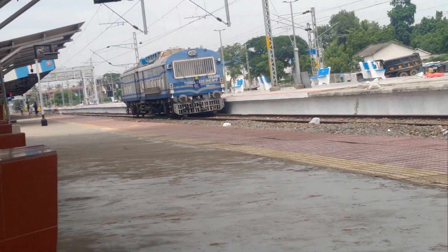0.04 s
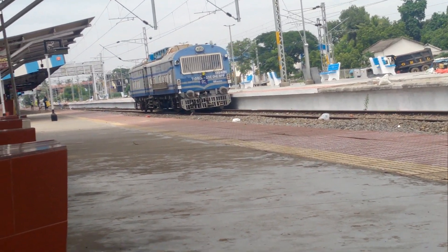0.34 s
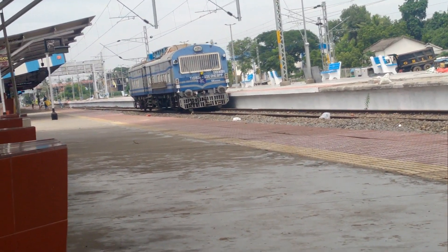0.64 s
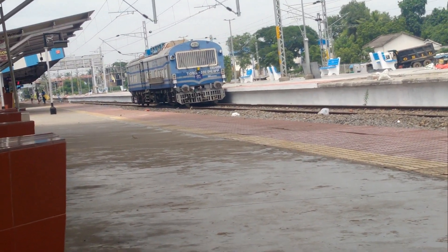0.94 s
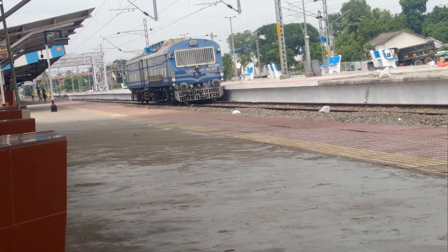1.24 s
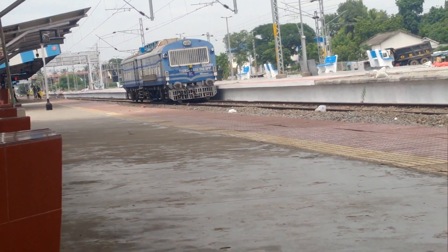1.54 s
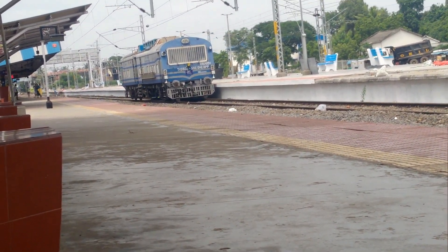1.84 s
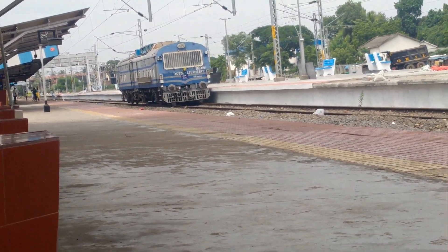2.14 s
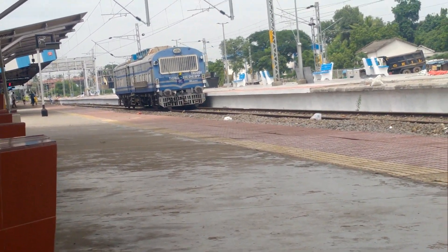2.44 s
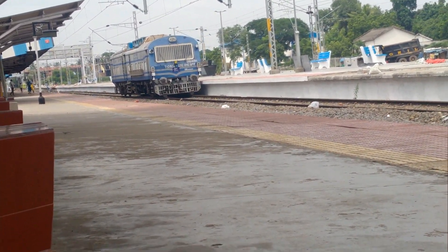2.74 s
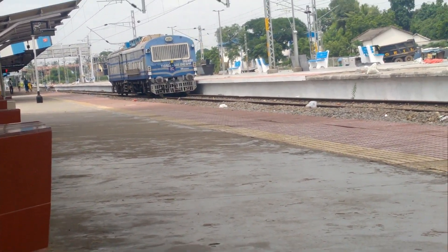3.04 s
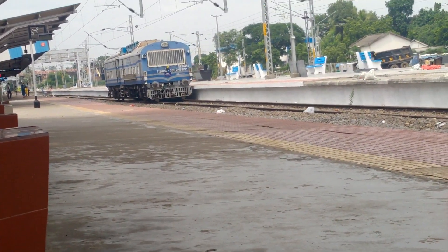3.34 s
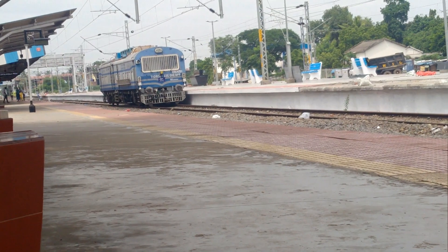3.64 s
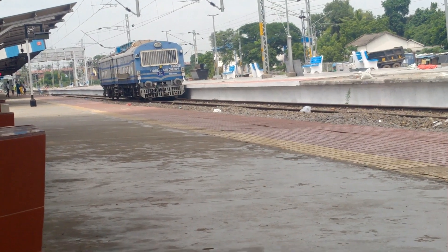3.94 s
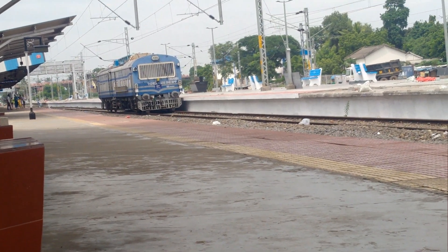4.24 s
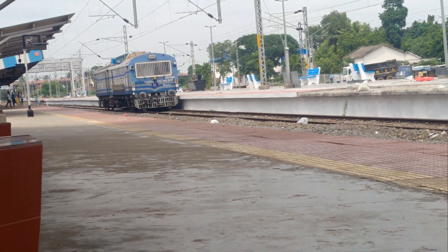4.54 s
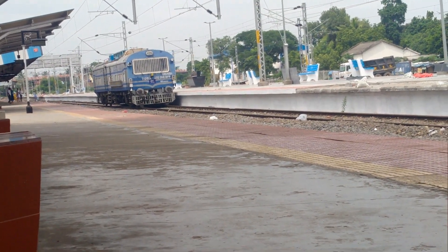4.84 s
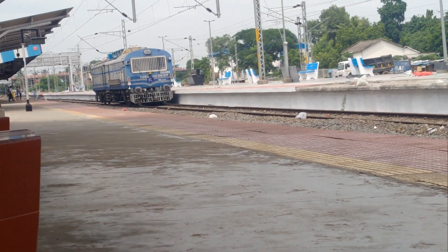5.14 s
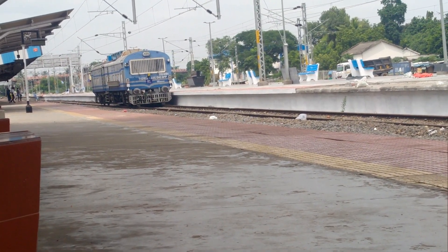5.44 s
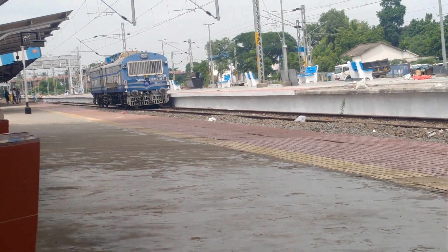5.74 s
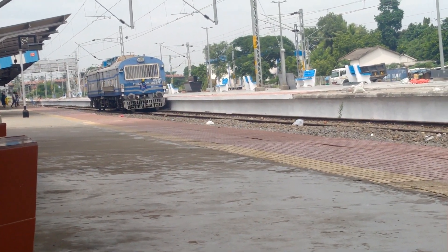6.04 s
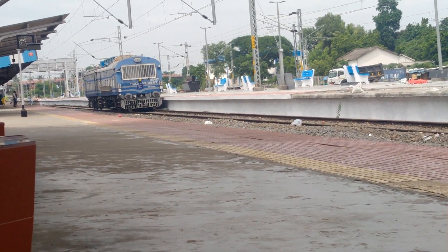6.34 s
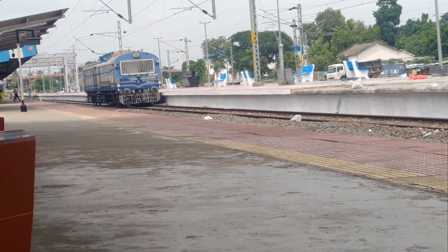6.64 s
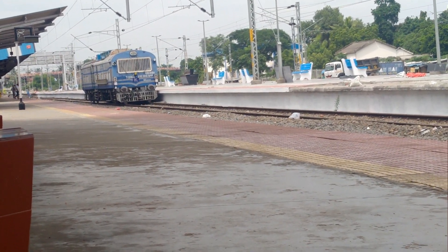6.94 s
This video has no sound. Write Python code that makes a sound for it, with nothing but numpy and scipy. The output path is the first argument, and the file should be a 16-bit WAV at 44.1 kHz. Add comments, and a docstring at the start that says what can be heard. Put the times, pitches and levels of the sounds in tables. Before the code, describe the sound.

A hammer strikes heavy steel about once a second, ringing sharply over an open railway station's wash and a rail car's faint hum.

```python
"""The wash of an open station and the faint hum of a standing rail car are heard from the start.
A hammer strikes heavy steel about once a second: a hard clank, then a dense ring that the platform roof
throws back. The steel slips and squeals before the second blow; faint, far whistles dot the first half.
From 2 s to about 6 s wind thumps softly on the microphone, and faint rustles follow three later blows.
Near 5.7 s a glancing blow runs into a full one, and the steel scrapes again just before the last."""
import sys
import numpy as np
from scipy import signal
from scipy.fft import rfft, irfft, next_fast_len
from scipy.io import wavfile
from scipy.ndimage import uniform_filter1d

SR = 44100
rng = np.random.default_rng(int(sys.argv[2]) if len(sys.argv) > 2 else 0)


def put_to_file(sound):
    """Save the sound as 16-bit audio at rate SR, in the file named by the first command-line argument."""
    columns = np.atleast_2d(sound).T  # one column per channel
    safe = np.clip(columns, -1, 1)
    whole_steps = np.round(safe * 32767)
    wavfile.write(sys.argv[1], SR, whole_steps.astype(np.int16))


N = 308259
TIME = np.arange(N) / SR

# Levels in the tables are relative.
# spectrum of the station's wash: (frequency [Hz], level [dB])
WASH_SPECTRUM = [(24, -55), (40, -14.5), (225, -2), (398, -9), (565, -7.5), (935, -11), (1090, -12.5),
                 (1160, -14), (2290, -21), (2560, -22.5), (2980, -24), (3550, -20.5), (5630, -25.5),
                 (6280, -30), (7480, -52), (9720, -70), (16500, -120)]
# slow swell of the wash: (time [s], level [dB])
WASH_SWELL = [(0, -47.5), (4.7, -45.5), (6.99, -49.5)]
# partials of the rail car's hum: (frequency [Hz], level [dB])
HUM_PARTIALS = [(220.7, -54), (1157, -64)]
# envelope of the hum: (time [s], level [dB])
HUM_ENVELOPE = [(0, 5.5), (.95, 7), (1.4, -5.5), (6.99, 2.5)]
# far whistles: (time [s], start frequency [Hz], end frequency [Hz])
WHISTLE_GLIDES = [(.85, 792, 870), (1.65, 604, 566), (3.40, 788, 870)]
# crests of the rustles: (time [s], level [dB])
RUSTLE_CRESTS = [(4.243, -38), (5.352, -44), (6.251, -49)]
# spectrum of a rustle: (frequency [Hz], level [dB])
RUSTLE_SPECTRUM = [(800, -34), (2000, 10), (3000, -2.5), (4000, 4.5), (5000, -8), (5800, 4), (7000, -34)]
# strongest eddies of the wind: (time [s], level [dB])
STRONG_EDDIES = [(2.688, -26.5), (2.78, -31), (3.275, -32.5), (3.755, -35), (4.335, -31.5), (4.457, -24.5),
                 (4.503, -23.5), (4.635, -27.5), (4.719, -30.5), (5.002, -24), (6.016, -31.5)]
# pressure spectrum of an eddy: (frequency [Hz], level [dB])
EDDY_SPECTRUM = [(24, -66.5), (40, -44), (89, -7.5), (146, 2.5), (329, -14.5), (489, -25.5), (567, -39),
                 (600, -36), (780, -63), (1320, -120)]
# slips of the steel: (time [s], duration [s], level [dB], harshness [0-1])
STEEL_SLIPS = [(0.840, 0.014, -34, 0.1), (0.932, 0.06, -35, 0.1), (6.754, 0.028, -34.5, 0.75),
               (6.768, 0.022, -27, 1)]
# friction-driven modes: (frequency [Hz], width that sets the rate of wavering [Hz], level [dB])
SQUEAL_MODES = [(2605, 22, -7), (3060, 28, -11), (3265, 25, 1), (3500, 25, -9), (4120, 35, -2.5),
                (4720, 28, -2), (5540, 87, -11.5), (6350, 44, -19)]
# spectrum of the contact's crack: (frequency [Hz], level [dB])
CRACK_SPECTRUM = [(300, -28), (1300, -7), (2800, 0.5), (3600, -11.5), (4800, 3), (5400, -3), (6200, -3),
                  (6600, -5), (7100, -28.5)]
# short-lived modes of the clank: (frequency [Hz], level [dB], T60 [s])
CLANK_MODES = [(429, -16, 0.11), (958, -9, .06), (1598, -1.5, 0.078), (1703, -3, .07), (1890, -7, 0.11),
               (2569, 2, 0.085), (2498, 0.5, 0.066), (2724, 3, 0.054), (2924, -3.5, 0.15), (4150, -13, 0.1),
               (5700, -17.5, 0.077), (5800, -15, 0.049)]
# close modes that beat as they sing: (frequency [Hz], level [dB], T60 [s])
SINGING_MODES = [(4795, -6, 0.69), (4775, -4.5, 0.77), (4730, -7, .45)]
# broad spectrum of the dense ring: (frequency [Hz], level [dB])
RING_SPECTRUM = [(150, -26), (330, -15), (480, -8), (680, -12.5), (860, -10), (1250, 1.5), (1650, -5.5),
                 (2100, -5), (2800, -2.5), (3300, -8.5), (5300, -14), (6000, -13), (6500, -22.5),
                 (7000, -39.5)]
# resonances standing above that spectrum: (frequency [Hz], width [Hz], height [dB])
RING_PEAKS = [(417.7, 19, 7), (544, 62, 9), (746, 35, 6.5), (920, 65, 5), (1128, 53, 3), (1243, 40, 3),
              (1557, 30, 5), (1654, 95, 6.5), (1977, 30, 6), (2170, 25, 5.5), (2345, 15, 7),
              (2380, 14, 7.5), (2605, 79, 3), (2865, 20, 6.5), (3015, 42, 5.5), (3700, 14, 5.5),
              (4790, 130, 5.5), (6487, 25, 12.5)]
# build-up of the ring: (frequency [Hz], time constant [s])
RING_RISE = [(300, 0.034), (700, 0.032), (1200, 0.019), (2500, 0.021), (4000, 0.0031), (7000, 0.0043)]
# decay of the ring, before each blow's decay factor: (frequency [Hz], T60 [s])
RING_DECAY = [(250, 2.54), (500, 0.79), (900, 1.7), (1300, 1.24), (2000, 0.91), (2800, 0.75), (3600, 0.6),
              (4800, 0.64), (6000, 0.51), (7500, 0.39)]
# likeness of each ring to the response all blows share: (frequency [Hz], correlation [0-1])
RING_LIKENESS = [(400, .93), (1400, .92), (2600, .82), (4500, .55), (7000, .4)]
# blows: (time [s], level [dB], decay factor [1], brightness [dB], singing level [dB],
# tail drops away after [s])
HAMMER_BLOWS = [(0.102, -15.5, 0.93, -1, -18, 0.38), (1.007, -16, 1.06, -1.5, -5, 0.39),
                (1.950, -15.4, 1.0, -1.5, -7.5, 0.48), (2.872, -15.5, 1.04, 3, -10, 0.355),
                (3.834, -15, 1.09, 1, -13, 0.56), (4.813, -15, 1.045, -1.5, -10.5, 0.5),
                (5.733, -21, 0.47, -9, -32, 0.34), (5.803, -18, 1.09, 10.5, -27, 0.35),
                (6.802, -16, 1.58, 3.5, -10.5, 0.43)]


def gain_of(db):
    """Amplitude grows tenfold for every 20 dB."""
    return 10 ** (np.asarray(db) / 20)


def unit_rms(x):
    """Normalisation to unit mean power."""
    return x / np.sqrt(np.mean(x ** 2) + 1e-20)


def curve_at(points, hz):
    """Interpolation over log frequency."""
    f, value = np.transpose(points)
    return np.interp(np.log(hz + 1), np.log(f + 1), value)


def add(mix, s, sound):
    """Superposition: a sound joins the mix at s seconds."""
    part = mix[max(round(s * SR), 0):][:len(sound)]
    part += sound[:len(part)]


def noise(gain):
    """Fourier synthesis: a magnitude spectrum with random phases gives noise, here of unit rms."""
    return unit_rms(irfft(gain * np.exp(2j * np.pi * rng.random(len(gain)))))


def coloured(spectrum, size):
    """Spectral shaping: noise that follows a tabled spectrum."""
    hz = np.fft.rfftfreq(2 * next_fast_len(size // 2 + 1, True), 1 / SR)
    return noise(gain_of(curve_at(spectrum, hz)))[:size]


def drift(max_hz, size):
    """Random modulation: slow sines sum to a fluctuation of unit rms."""
    t = np.arange(0, size + 256, 256) / SR
    rates = max_hz * rng.uniform(0.091, 1, size=(16, 1))
    waves = np.sin(2 * np.pi * (rates * t + rng.random((16, 1)))).sum(0)
    return np.interp(np.arange(size) / SR, t, unit_rms(waves))


def patchwork(shape, frames, bins):
    """Smoothing correlates random values into patches over frequency and time."""
    across_bins = uniform_filter1d(rng.standard_normal(shape), size=bins, axis=0)
    return unit_rms(uniform_filter1d(across_bins, size=frames, axis=1))


def bump(hz, centre_hz, octaves):
    """Gaussian weighting over log frequency."""
    return np.exp(-.5 * (np.log2((hz + 1) / centre_hz) / octaves) ** 2)


def high_pass(x, hz, order):
    """A Butterworth filter attenuates the bass."""
    return signal.sosfilt(signal.butter(order, hz, "high", fs=SR, output="sos"), x)


def tone(hz):
    """Phase is the running integral of frequency."""
    return np.sin(2 * np.pi * np.cumsum(hz) / SR)


def modes(table, t):
    """Free vibration is a sum of decaying sines, each a little different on every blow."""
    return sum(gain_of(db + rng.normal(0, 0.97) - 60 * t / t60)
               * np.sin(2 * np.pi * (hz * rng.normal(1, .002) * t + rng.random()))
               for hz, db, t60 in table)


def station_wash(patchy_db=1.0, gust_db=3.0):
    """Modulated noise: the distant wash drifts in patches while the breeze stirs its low end."""
    hz, t, bands = signal.stft(coloured(WASH_SPECTRUM, N), SR, nperseg=1024, noverlap=768)
    patches = patchwork(bands.shape, frames=18, bins=4)
    gusts = np.interp(t, TIME, drift(5.3, N)) * bump(hz, 120, 0.31)[:, None]
    bands = bands * gain_of(patchy_db * patches + gust_db * gusts)
    wash = signal.istft(bands, SR, nperseg=1024, noverlap=768)[1][:N]
    return unit_rms(wash) * gain_of(np.interp(TIME, *np.transpose(WASH_SWELL)))


def rail_car_hum(trim_db=-1, waver=0.0018):
    """A line spectrum: the standing car hums on two slightly wavering partials."""
    partials = sum(gain_of(db) * tone(hz * (1 + waver * drift(11, N))) for hz, db in HUM_PARTIALS)
    return partials * gain_of(trim_db + np.interp(TIME, *np.transpose(HUM_ENVELOPE)))


def far_whistles(length_s=0.11, db=-48.5):
    """Frequency modulation: short, thin tones glide and waver."""
    out = np.zeros(N)
    for s, start_hz, end_hz in WHISTLE_GLIDES:
        glide = np.linspace(start_hz, end_hz, int(length_s * SR))
        hz = glide * (1 + 0.007 * drift(50, len(glide)))
        add(out, s, gain_of(db) * signal.windows.tukey(len(hz), .6) * tone(hz))
    return out


def rustles(width_s=0.076):
    """Amplitude modulation: bright noise under Gaussian swells is heard as soft rustles."""
    swells = sum(gain_of(db) * np.exp(-(2 * (TIME - s) / width_s) ** 2) for s, db in RUSTLE_CRESTS)
    return swells * coloured(RUSTLE_SPECTRUM, N)


def wind_thumps(breeze_s=(2.0, 6.2), weak_count=12, weak_db=-37.5, trim_db=-0.5, rise_s=0.008, t60=0.16):
    """Turbulent pressure: eddies thump on the microphone, strong ones among weak ones at random."""
    out = np.zeros(N)
    t = np.arange(SR // 4) / SR
    push = gain_of(-60 * t / t60) * np.minimum(t / rise_s, 1)
    weak_eddies = [(s, weak_db) for s in rng.uniform(*breeze_s, size=weak_count)]
    for s, db in [*STRONG_EDDIES, *weak_eddies]:
        eddy = unit_rms(push * coloured(EDDY_SPECTRUM, len(t))) * np.sqrt(np.mean(push ** 2))
        add(out, s - rise_s / 2, gain_of(db + trim_db) * eddy)
    return out


def with_wall_echo(x, delay_s=.555, echo_db=-43):
    """Reflection: a far wall returns each blow late and faint."""
    out = x.copy()
    add(out, delay_s, gain_of(echo_db) * x)
    return out


def scrape(length_s, db, harsh, grit_db=-2, waver=0.009, attack_s=0.005, t60=0.35):
    """Friction drives the lowest squeal mode; pressed harder, the steel adds upper modes and grit."""
    t = np.arange(SR // 3) / SR
    envelope = np.minimum(t / attack_s, 1) * gain_of(db - 60 * np.maximum(t - length_s, 0) / t60)
    grit = coloured([(1500, -25), (2400, 5.5), (5000, -6), (6500, -17), (7500, -37.0)], len(t))
    sound = gain_of(grit_db) * harsh * grit
    for k, (hz, width, mode_db) in enumerate(SQUEAL_MODES):
        squeal = tone(hz * (1 + waver * drift(6 * width, len(t))))
        flutter_db = 4.0 * drift(58, len(t))
        sound += (harsh if k else 1) * gain_of(mode_db + flutter_db) * squeal
    return envelope * sound / np.sqrt(.5 + 2.1 * harsh ** 2)


def clank(t, slide_db, mid_db, top_db, slide_hz=1350, sag=.12, sag_s=0.0752, slide_t60=0.6,
          crack_db=-3, crack_t60=0.085):
    """Impact excitation: the contact cracks and wakes short, loud modes; one slides down as it dies."""
    crack = gain_of(crack_db + top_db - 60 * t / crack_t60) * coloured(CRACK_SPECTRUM, len(t))
    struck = modes([(hz, db + mid_db * bump(hz, 2550, 0.14) + top_db * bump(hz, 6000, 0.59), t60)
                    for hz, db, t60 in CLANK_MODES], t)
    slide = tone(slide_hz * (1 - sag * (1 - np.exp(-t / sag_s))))
    return crack + struck + gain_of(slide_db - 60 * t / slide_t60) * slide


def ring(dense, reflections, mid_db, bright_db, top_db, decay_factor, drop_s,
         bass_db=-0.15, hold_s=0.058, drop_db=10, lumpy_db=2.0, far_db=-28, far_t60=2.34):
    """Reverberant decay: the ring swells, holds amid reflections, dies by band and leaves a far tail."""
    hz, t, bands = signal.stft(dense, SR, nperseg=256)
    colour_db = (bass_db * bump(hz, 450, 0.44) + mid_db * bump(hz, 2900, 0.12)
                 + bright_db * bump(hz, 3930, 0.17) + top_db * bump(hz, 7300, 0.37))
    swell = 1 - np.exp(-(t + 0.00099) / curve_at(RING_RISE, hz)[:, None])
    fall_db = 60 * np.maximum(t - hold_s, 0) / (decay_factor * curve_at(RING_DECAY, hz)[:, None])
    # a noise gate cuts the ring's tail, treble first
    gate_s = drop_s * (np.maximum(hz, 2500)[:, None] / 2500) ** -0.4
    gate_db = drop_db * (.5 + .5 * np.tanh((t - gate_s) / .034))
    near = gain_of(lumpy_db * reflections[:len(hz), :len(t)] - fall_db - gate_db)
    far = gain_of(far_db - 60 * t / far_t60)
    bands = bands * gain_of(colour_db)[:, None] * swell * np.hypot(near, far)
    return signal.istft(bands, SR, nperseg=256)[1][:len(dense)]


def hammer(lead_s=.004, rise_s=0.0061, low_cut_hz=230, flutter_db=5.0, sing_s=.28,
           return_s=0.51, return_db=-30, return_t60=.2):
    """Modal response: every blow wakes the same modes; the highest vary most with the spot struck."""
    size = 49152
    hz, t = np.fft.rfftfreq(size, 1 / SR), np.arange(size) / SR
    peaks_db = sum(db / (1 + (2 * (hz - f) / width) ** 2) for f, width, db in RING_PEAKS)
    spectrum = gain_of(curve_at(RING_SPECTRUM, hz) + peaks_db)
    shared = rfft(noise(spectrum))
    likeness = curve_at(RING_LIKENESS, hz)
    reflections = patchwork((129, 400), frames=7, bins=2)
    # the blow takes a few milliseconds to spread through the steel
    envelope = np.minimum(t / rise_s, 1) ** 2 * np.minimum((t[-1] - t) / .1, 1)
    early = t[:size // 3]
    out = np.zeros(N)
    for s, db, decay_factor, bright_db, sing_db, drop_s in HAMMER_BLOWS:
        # a glancing blow rings briefly: it has more clank, and its ring is dull
        clank_db = 1 - 7 * np.log2(decay_factor)
        dull_db = -33.5 * max(1 - decay_factor, 0) ** 2
        mid_db, top_db, slide_db = 0.16 + dull_db, 0.62 * bright_db + dull_db, -7.5 + dull_db / 2
        dense = irfft(likeness * shared + np.sqrt(1 - likeness ** 2) * rfft(noise(spectrum)))
        sound = ring(dense, reflections, mid_db, bright_db, top_db, decay_factor, drop_s)
        add(sound, 0, gain_of(clank_db) * clank(early, slide_db, mid_db, top_db))
        # the singing cluster flutters until it drops away, then comes back once, faintly
        singing = gain_of(sing_db + flutter_db * drift(45, len(early))) * modes(SINGING_MODES, early)
        add(sound, 0, singing * (.5 - .5 * np.tanh((early - sing_s) / .03)))
        add(sound, return_s, singing * gain_of(return_db - 60 * early / return_t60))
        add(out, s - lead_s, gain_of(db) * envelope * sound)
    return high_pass(out, low_cut_hz, order=2)


def scene():
    """Superposition: the pressures of all sources add at one microphone."""
    mix = with_wall_echo(hammer()) + rustles() + wind_thumps()
    mix += station_wash() + rail_car_hum() + far_whistles()
    for s, length_s, db, harsh in STEEL_SLIPS:
        add(mix, s, scrape(length_s, db, harsh))
    return mix[None]


def record(dry, ceiling=0.72, knee=4.5, low_cut_hz=72, high_cut_hz=7630):
    """Saturation and band limiting: the microphone drops deep bass, a limiter rounds peaks; the top is cut."""
    thin = high_pass(dry, low_cut_hz, order=4)
    rounded = thin / (1 + abs(thin / ceiling) ** knee) ** (1 / knee)
    faded = rounded * signal.windows.tukey(N, .001)
    low_pass = signal.firwin(511, high_cut_hz, window=("kaiser", 9), fs=SR)
    return signal.oaconvolve(faded, low_pass[None], "same")


dry = scene()
out = record(dry)
put_to_file(out)
```